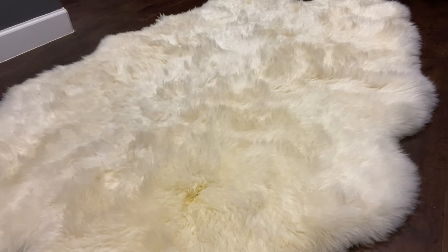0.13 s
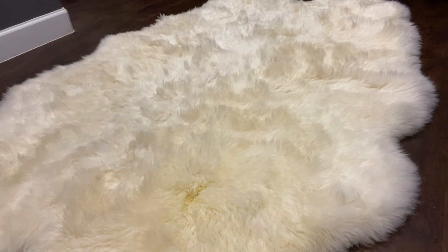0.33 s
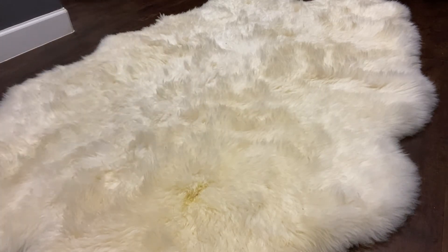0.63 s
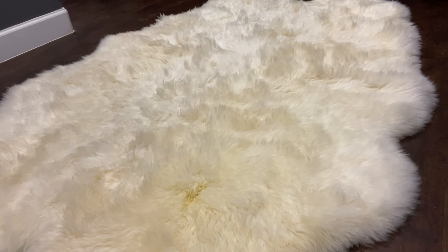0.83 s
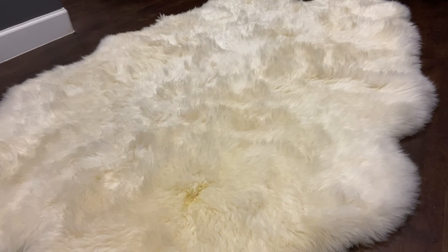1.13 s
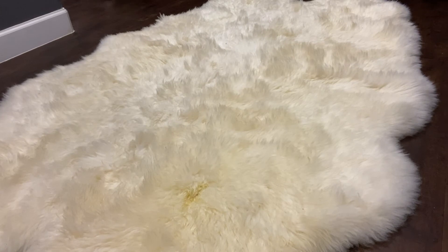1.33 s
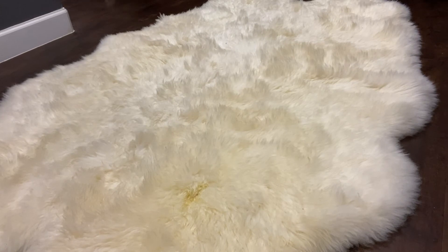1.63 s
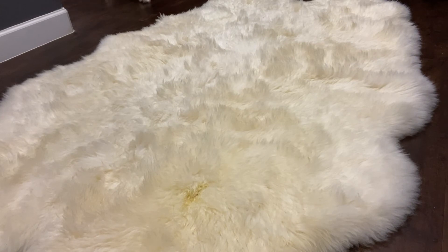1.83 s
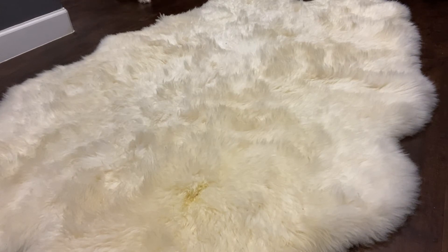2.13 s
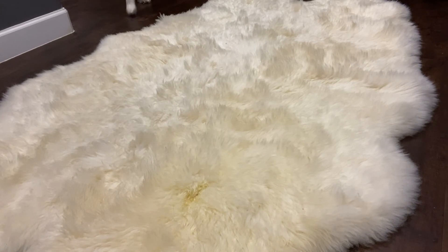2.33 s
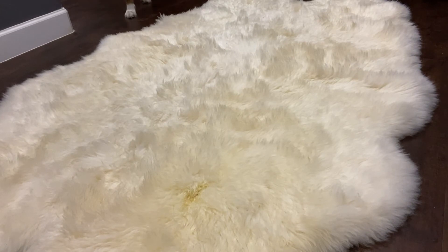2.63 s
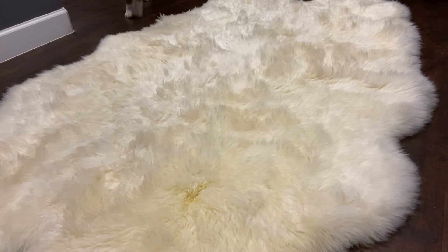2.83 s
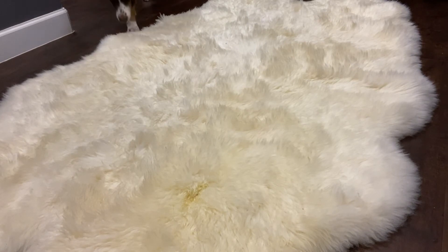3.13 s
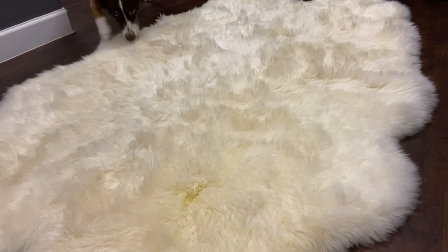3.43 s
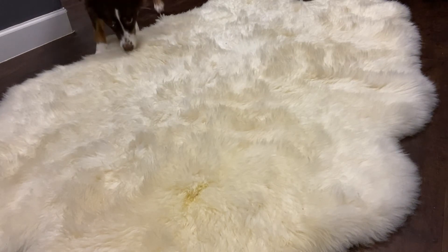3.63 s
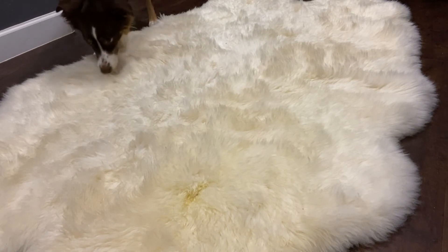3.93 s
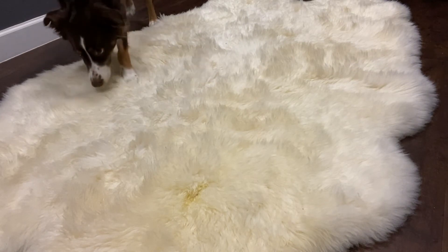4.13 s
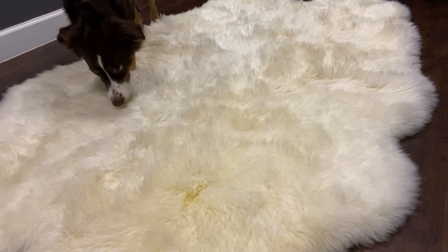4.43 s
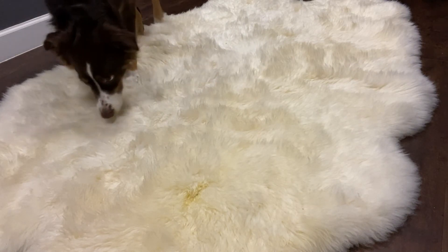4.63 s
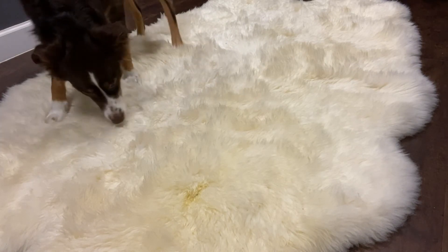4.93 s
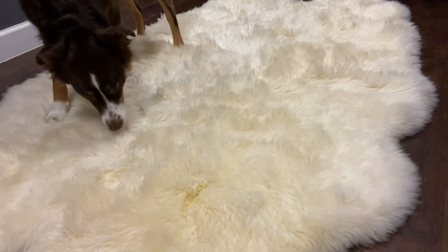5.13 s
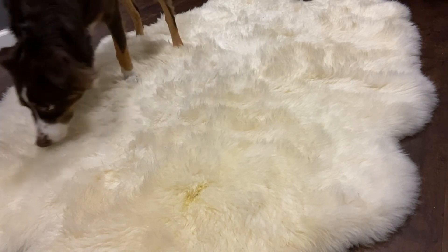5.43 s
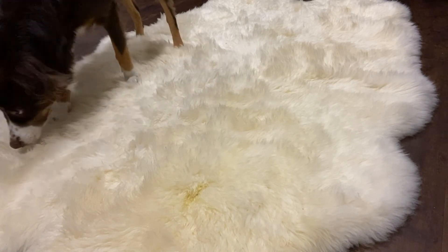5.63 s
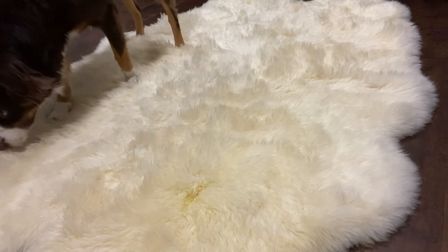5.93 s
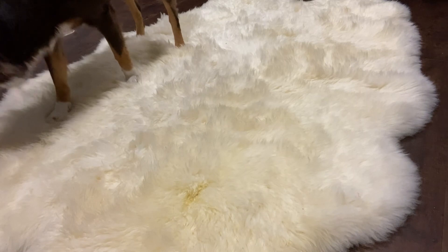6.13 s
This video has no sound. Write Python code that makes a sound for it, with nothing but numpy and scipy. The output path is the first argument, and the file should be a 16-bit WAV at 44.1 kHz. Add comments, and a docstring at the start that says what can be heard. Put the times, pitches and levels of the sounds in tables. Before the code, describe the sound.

Nine muffled, bassy steps cross springy boards indoors over a low hum, followed by scraping, creaking wooden furniture and one hard resonant knock.

```python
"""First a soft footstep booms on a wooden floor, over a low hum; more steps follow across a live room.
Each step swings the boards and pats the sole in short runs of noise; clothes swish and small ticks sound.
Then furniture is shifted and bumped: noisy contacts ring its panels, and its joints creak faintly.
Two close microphone ports hear the direct sound and the noise-like echo of the room."""
import sys
import numpy as np
from scipy import signal
from scipy.fft import rfft, irfft, next_fast_len
from scipy.io import wavfile
from scipy.ndimage import uniform_filter1d

SR = 44100
rng = np.random.default_rng(int(sys.argv[2]) if len(sys.argv) > 2 else 0)


def pcm_store(signal):
    """Save signal as 16-bit PCM."""
    levels = np.round(np.clip(np.atleast_2d(signal), -1, 1) * 32767)
    wavfile.write(sys.argv[1], SR, levels.astype(np.int16).T)


N = 277036  # length of the scene in samples
T = np.arange(SR) / SR  # time within one sound [s]; each lasts up to a second
HZ = np.fft.rfftfreq(2 * SR, 1 / SR)  # frequencies of a two-second transform


def amp(db):
    """Turn decibels into gain."""
    return 10 ** (np.asarray(db) / 20)


def unit(x):
    """Scale to an rms of 1."""
    return x / np.sqrt(np.mean(x ** 2) + 1e-20)


def crest(x):
    """Scale so that the loudest 20 ms have an rms of 1."""
    power = uniform_filter1d(np.mean(x ** 2, axis=0), size=SR // 50)
    return x / np.sqrt(power.max() + 1e-20)


def along(points, hz):
    """Read a curve of (frequency, value) points on a logarithmic frequency axis."""
    f, v = np.transpose(points)
    return np.interp(np.log(hz + 1), np.log(f + 1), v)


def filtered(x, response):
    """Shape a sound by a response that depends on frequency."""
    n = x.shape[-1]
    padded = next_fast_len(n + SR // 10)
    spectrum = rfft(x, padded) * response(np.fft.rfftfreq(padded, 1 / SR))
    return irfft(spectrum, padded)[..., :n]


def resonance(hz, centre, width):
    """One mode's response, 1 at its centre."""
    return 1j * hz * width / (centre ** 2 - hz ** 2 + 1j * hz * width)


def add(track, s, sound):
    """Mix a sound into the track at time s."""
    start = round(s * SR)
    part = sound[:, max(-start, 0):N - start]
    track[:, max(start, 0):][:, :part.shape[1]] += part


def grains(rough_db):
    """A dense run of tiny contacts: noise whose strength changes at random every millisecond."""
    size = np.interp(T, np.arange(1001) / 1000, rng.standard_normal(1001))
    return rng.standard_normal(SR) * amp(rough_db * size)


def blow(length):
    """A force that swells to its peak in the given time and dies away."""
    return (T / length * np.exp(-T / length)) ** 2


def swell(half):
    """A bell-shaped stroke that peaks a quarter of a second in."""
    return np.exp(-((T - 1 / 4) / half) ** 2 / 2)


def coloured(x, spectrum, body_db, middle_db, treble_db, ripple_db=3.5):
    """The material's spectrum, rippled by the spot that is touched; hardness sets the three bands."""
    low = 1 / (1 + (HZ / 700) ** 6)
    high = 1 / (1 + (HZ / 3500) ** 6)
    knots = 300 * np.expm1(np.linspace(0, 1, 150) ** .6 * np.log(SR / 600))
    ripple = np.interp(HZ, knots, rng.standard_normal(len(knots))) / (1 + HZ / 9000)
    z = rfft(x, 2 * SR) * amp(along(spectrum, HZ) + ripple_db * ripple)
    shares = [(low, body_db), (high - low, middle_db), (1 - high, treble_db)]
    return sum(amp(db) * crest(irfft(z * share)[:, :SR]) for share, db in shares)


# how different the two ports are in sound from all around: (frequency [Hz], side minus mid [dB])
PORT_WIDTH = [(60, -15), (130, 0.5), (220, -5.5), (380, -3), (700, 1.5), (1250, 4.5), (2400, -0.5),
              (4400, -0.5), (8000, -3), (14000, 5.5)]


def diffuse(n):
    """Noise from all around: a shared part, and a part with opposite sign at the two ports."""
    def shares(hz):
        ratio = amp(along(PORT_WIDTH, hz))
        return np.array([np.ones_like(hz), ratio]) / np.hypot(1, ratio)

    mid, side = filtered(rng.standard_normal((2, n)), shares)
    return np.array([mid + side, mid - side])


# how long the room rings: (frequency [Hz], time to fall by 60 dB [s])
ROOM_DECAY = [(60, 0.4), (250, 0.71), (1000, 0.53), (2200, 0.54), (5000, 0.38), (9000, 0.47), (14000, 0.22)]
# direct sound at the two ports: (frequency [Hz], phase by which the left leads [radians])
PORT_LEAD = [(0, -1), (520, 2.18), (1550, 3.0), (3010, 9), (5680, 10.5), (6370, 10.5), (6800, 10.5),
             (8180, 12), (10100, 7.5), (10900, 5.5), (12500, 19.5), (13700, 14), (14600, 24.5),
             (15000, 22.5)]


def in_room(source, direct_db, early_db, early_t60=0.17, gap=0.0039):
    """The direct sound comes first; then near walls and the whole room give its energy back."""
    hz, t, noise = signal.stft(diffuse(SR), SR, nperseg=128)
    energy = np.mean(abs(signal.stft(source, nperseg=128)[2]) ** 2, axis=0)
    late = amp(-60 * t / along(ROOM_DECAY, hz)[:, None]) ** 2
    early = amp(early_db - 60 * t / early_t60) ** 2
    decay = (late + early) * (1 - np.exp(-t / gap))  # the echo builds up over the gap [s]
    stored = np.abs(signal.fftconvolve(energy[None], decay, axes=1)[:, :len(t)])
    tail = signal.istft(noise * np.sqrt(stored), SR, nperseg=128)[1][:, :SR]
    lag = np.interp(HZ, *np.transpose(PORT_LEAD))
    direct = irfft(rfft(source, 2 * SR) * np.exp(-1j * np.array([0 * lag, lag])))[:, :SR]
    return amp(direct_db) * unit(direct) + unit(tail)


# colour of the quiet room's air, before its overall level: (frequency [Hz], level per Hz [dB])
AIR_SPECTRUM = [(20, -22), (50, 2.5), (80, 4), (180, -16), (370, -15.5), (600, -24.5), (1000, -29),
                (2000, -38.5), (3500, -39.5), (6000, -40.5), (9000, -43.5), (13500, -41.5), (15000, -66)]


def room_air(air_db=-55, hum_hz=120, hum_db=-60):
    """The steady rumble of the house is shaped noise; its mains hum is one sine wave."""
    air = unit(filtered(diffuse(N), lambda hz: amp(along(AIR_SPECTRUM, hz))))
    hum = np.sin(2 * np.pi * hum_hz * np.arange(N) / SR)
    return amp(air_db) * air + amp(hum_db) * hum


# colour of a soft sole on the floor, before its bands are levelled: (frequency [Hz], level per Hz [dB])
SOLE_SPECTRUM = [(90, -26), (160, -5), (260, 3.5), (420, 4), (700, -3), (1100, -2), (1600, -5),
                 (2400, -10.5), (3500, -22.5), (5000, -33.5), (8000, -38.5), (13000, -42.5), (15000, -58)]


def shuffles(count=34, span_s=5.2, body_db=-61, middle_db=-65, treble_db=-72, spread_db=10):
    """Faint stray touches of feet, one at a random moment in each equal slice of the span."""
    out = np.zeros((2, N))
    for k, (when, size) in enumerate(rng.random((count, 2))):
        touch = in_room(grains(rough_db=10.0) * blow(.006), direct_db=-3.5, early_db=1)
        touch = coloured(touch, SOLE_SPECTRUM, body_db, middle_db, treble_db)
        add(out, (k + when) / count * span_s, amp(spread_db * (size - 0.5)) * touch)
    return out


# small sharp ticks: (time of peak force [s], treble level [dB], middle re treble [dB])
FLOOR_TICKS = [(.03, -44.5, -3), (0.3977, -54.5, -3.5), (0.6141, -47.5, -20), (.929, -52.5, -3.5),
               (1.696, -53, -2), (2.148, -45, -14), (2.179, -53.5, 6), (2.821, -66.5, 0),
               (3.3272, -45.5, 1), (3.5193, -59, 11), (3.619, -60.5, 2.5), (3.8887, -45.5, -14),
               (4.378, -51, 11.5), (4.609, -53.5, 0.5)]


def ticks(length=.0021, body_db=-4):
    """Hard little contacts on the floor, near enough to arrive ahead of the room."""
    out = np.zeros((2, N))
    for s, db, middle_db in FLOOR_TICKS:
        tick = in_room(grains(rough_db=4) * blow(length), direct_db=-2, early_db=9)
        add(out, s - length, amp(db) * coloured(tick, CLOTH_SPECTRUM, body_db, middle_db, 0))
    return out


# middle band re treble in a usual swish, its half length, and how much duller slower strokes are
SWISH_MIDDLE_DB, SWISH_HALF_S, DULLER_DB_PER_OCTAVE = 1, 0.049, 5
# colour of cloth, also lent to the ticks, before its bands are levelled: (frequency [Hz], level per Hz [dB])
CLOTH_SPECTRUM = [(150, 0.5), (400, -2.5), (1200, -2), (2300, -4.5), (3600, -3), (5500, -8), (8000, -8.5),
                  (10000, -11.5), (13000, -15.5), (15000, -24)]


def clothes(body_db=-1.5, fizz=0.91):
    """Fabric brushes past itself with each stride; quick strokes have the most fizz."""
    out = np.zeros((2, N))
    for s, *_, after, db, half in STRIDES:
        middle_db = SWISH_MIDDLE_DB + DULLER_DB_PER_OCTAVE * np.log2(half / SWISH_HALF_S)
        swish = in_room(grains(rough_db=6) * swell(half), direct_db=-2.5, early_db=15.5)
        cloth = [(hz, level - fizz * middle_db * (hz > 9000)) for hz, level in CLOTH_SPECTRUM]
        swish = coloured(swish, cloth, middle_db + body_db, middle_db, 0)
        add(out, s + after - 1 / 4, amp(db) * swish)
    return out


# creaks of a joint: (centre time [s], level [dB], half length [s], pitch [Hz])
JOINT_CREAKS = [(3.665, -57, .012, 890), (4.361, -43.5, .04, 2960), (4.402, -35, 0.021, 955),
                (4.462, -46.5, .022, 950), (4.681, -44, 0.064, 910), (4.896, -44.5, .04, 2770)]


def creaks(sharpness=15):
    """A loaded joint slips unevenly and sings in one narrow resonance."""
    out = np.zeros((2, N))
    for s, db, half, hz in JOINT_CREAKS:
        slip = in_room(grains(rough_db=6) * swell(half), direct_db=-3, early_db=2)
        sung = filtered(slip, lambda f: resonance(f, hz, hz / sharpness) ** 2)
        add(out, s - 1 / 4, amp(db) * crest(sung))
    return out


# the furniture's panel modes, before panel_db is added: (frequency [Hz], level [dB])
PANEL_MODES = [(217, 1), (248, -19), (277, -1), (375, 1.5), (467, -0.5), (513, -8), (667, 5), (803, -10),
               (830, -3.5), (919, 3), (1000, -10.5), (1078, -0.5), (2584, -4.5), (2832, 5)]


def panels(x, panel_db=-1, panel_width_hz=11):
    """The furniture's wooden panels ring with whatever shakes them; higher modes are wider."""
    modes = 1 + sum(amp(level + panel_db) * resonance(HZ, hz, panel_width_hz * np.sqrt(hz / 300))
                    for hz, level in PANEL_MODES)
    return irfft(rfft(x, 2 * SR) * modes)[:, :SR]


# colour of wood, before its bands are levelled: (frequency [Hz], level per Hz [dB])
WOOD_SPECTRUM = [(90, -11.5), (160, -14), (205, -11), (300, -8), (450, -9.5), (650, -8.5), (1050, -5),
                 (1600, -8), (2700, -16), (3300, -17.5), (4600, -19), (6000, -24.5), (7700, -23.5),
                 (9500, -31.5), (13500, -31), (15000, -53)]
# a scraping push, then the fading tail of the big knock, before level_db is added: (time [s], level [dB])
SCRAPE_AND_TAIL = [
    [(4.3, -39.5), (4.414, -45.5), (4.616, -51.5), (4.654, -52), (4.788, -63), (4.892, -39), (4.948, -48.5),
     (4.96, -31.5)],
    [(5.18, -39.5), (5.246, -47), (5.346, -52), (5.366, -42.5), (5.38, -48.5)],
]


def uneven_wood(level_db=-3, body_db=-2, treble_db=-10):
    """Uneven wooden noise: first a scraping push, then the fading tail of the big knock."""
    out = np.zeros((2, N))
    for points in SCRAPE_AND_TAIL:
        s, db = np.transpose(points)
        strength = amp(np.interp(s[0] + T, s, db, right=-120))
        uneven = grains(rough_db=7.5) * strength
        noise = panels(in_room(uneven, direct_db=-8, early_db=6.5))
        noise = coloured(noise, WOOD_SPECTRUM, body_db, 0, treble_db)
        add(out, s[0], amp(db.max() + level_db) * noise)
    return out


def rattle(length, ring_hz, ring_db=0.0, ring_width=0.2):
    """A short run of contacts that rings the panels and fills the room."""
    contacts = in_room(grains(rough_db=1.5) * blow(length), direct_db=-2.0, early_db=1.5)
    return filtered(panels(contacts), lambda f: 1 + amp(ring_db) * resonance(f, ring_hz, ring_width * ring_hz))


# an edge strikes first: its middle band; the mass follows: its delay, and its rattle length re the edge's
EDGE_DB, MASS_LAG_S, MASS_LENGTH_RATIO = -1, .011, 0.98
# furniture knocks: (time [s], level [dB], body re level [dB], treble re level [dB], edge rattle length [s],
#   edge resonance [Hz], mass resonance [Hz], load on the floor [dB], pitch of the boards [Hz])
FURNITURE_KNOCKS = [(4.225, -25, -9, -8, 0.017, 1060, 1270, -12, 71.4),
                    (4.371, -34.5, -1, -13, 0.0054, 940, 970, -16.5, 48.6),
                    (4.83, -41, 5.5, -31, .018, 743, 400, -18, 66.4),
                    (4.984, -19.5, 6, -7.5, 0.011, 1008, 236, -11.5, 86),
                    (5.368, -40.5, 1, -6.5, 0.0089, 1970, 292, -34, 65),
                    (5.9, -35.5, -1.5, -10, 0.013, 2130, 620, -35.5, 61.3)]


def furniture(edge_body_db=-10, mass_treble_db=-7, left_db=0.08):
    """Each knock is a bright edge, then the duller mass behind it."""
    out = np.zeros((2, N))
    for s, db, body_db, treble_db, length, edge_hz, mass_hz, *_ in FURNITURE_KNOCKS:
        edge = rattle(length, edge_hz)
        edge = coloured(edge, WOOD_SPECTRUM, body_db + edge_body_db, EDGE_DB, treble_db)
        add(out, s, amp(db) * edge)
        mass = rattle(length * MASS_LENGTH_RATIO, mass_hz)
        mass = coloured(mass, WOOD_SPECTRUM, body_db, 0, treble_db + mass_treble_db)
        add(out, s + MASS_LAG_S, amp(db) * mass)
    return out * amp([[left_db], [-left_db]])


def pat(length, ring_hz, body_db, treble_db, ring_db=1, ring_width=0.38):
    """A soft contact some way off, coloured like a sole on the floor; uneven grains make it crackle."""
    contact = in_room(grains(rough_db=8) * blow(length), direct_db=-2, early_db=3)
    contact = filtered(contact, lambda f: 1 + amp(ring_db) * resonance(f, ring_hz, ring_width * ring_hz))
    return coloured(contact, SOLE_SPECTRUM, body_db, 0, treble_db)


# other small soft noises: (time [s], level [dB], body re level [dB], treble re level [dB],
#   contact length [s], main resonance [Hz])
SOFT_NOISES = [(0.549, -46, -12, -1, 0.0033, 2180), (0.661, -37, -3, -6, 0.0059, 2040),
               (0.956, -40.5, -3, -26, 0.005, 750), (1.673, -42.5, -3, -6, 0.0032, 1870),
               (1.839, -49, -35, -3.5, 0.011, 1730), (1.927, -55.5, -18, -16, 0.027, 2300),
               (2.74, -59.5, -16, -8.5, 0.0044, 2430), (2.925, -50, -0.5, -21.5, 0.0045, 1070),
               (3.033, -51, -14, -5.5, 0.0096, 1430), (3.303, -55.5, 8.5, -15, .006, 740),
               (3.898, -35, -34, -11, 0.016, 930), (4.089, -54.5, -4, -4, 0.029, 1100),
               (6.167, -65.5, 10, 1.5, 0.017, 2200)]


def soft_noises():
    """Other small soft noises, each a short run of grains: scuffs, a crunch and loose swishes."""
    out = np.zeros((2, N))
    for s, db, body_db, treble_db, length, ring_hz in SOFT_NOISES:
        add(out, s, amp(db) * pat(length, ring_hz, body_db, treble_db))
    return out


# the sole comes down flat after its first touch: delay, level re the touch, extra body
FLAT_S, FLAT_DB, FLAT_BODY_DB = .037, -4, 8
# contact length, treble of the grit at the first touch (FLAT_DB also applies when flat), main resonance
PAT_S, GRIT_DB, SOLE_HZ = 0.011, -56, 787


def soles():
    """In each stride the sole touches, then comes down flat."""
    out = np.zeros((2, N))
    for s, _, _, _, _, after, db, body_db, *_ in STRIDES:
        touch = pat(PAT_S, SOLE_HZ, body_db, GRIT_DB - db)
        add(out, s + after, amp(db) * touch)
        flat = pat(PAT_S, SOLE_HZ, body_db + FLAT_BODY_DB, GRIT_DB - db)
        add(out, s + after + FLAT_S, amp(db + FLAT_DB) * flat)
    return out


BALL_PITCH = 0.889  # the full weight lowers the boards' pitch by this ratio
ROCK_S, ROCK_LOSS_DB, REST_HZ = .075, 11, 57.4  # the weight rocks to rest: period, loss per rock, pitch
# the floor takes a knock's load after a lag, then the piece tips onto its other side: delay, level re load
LOAD_LAG_S, TIP_S, TIP_DB = 0.039, 0.0607, -1.5
# one row per stride: (heel time [s], weight [dB], pitch of the boards [Hz], roll to the ball [s],
#   ball re heel [dB], sole touches after heel [s], pat level [dB], pat body re level [dB],
#   swish peak after heel [s], swish treble level [dB], swish half length [s])
STRIDES = [(.001, -26, 61.7, .04, -3.5, -0.0098, -53, -7.5, 0.15, -45, 0.011),
           (0.623, -17, 81.4, 0.046, 5, 0.00048, -54, 5.5, 0.084, -40.5, 0.017),
           (1.069, -16.5, 52.6, 0.1, -2.5, -0.028, -48, 2, 0.06, -50, .028),
           (1.561, -9.5, 68.5, .056, 0, -.01, -57, 4.5, 0.014, -51, 0.084),
           (2.018, -20, 54.5, 0.052, 3.5, -0.046, -39, -9, 0.081, -55.5, 0.049),
           (2.468, -23, 64.3, 0.044, 9.5, -.044, -43, -7, 0.06, -56, 0.053),
           (2.918, -13, 71.4, 0.0491, 1, .007, -60.5, 0.5, .085, -57.5, 0.047),
           (3.356, -16, 55, .074, -0.5, -.008, -37, 0, 0.079, -57.5, 0.038),
           (3.775, -17.5, 57.7, .07, -5, .069, -40, 1, 0.14, -59, 0.094)]


def loads():
    """Weight lands, rolls onto a second point and rocks to rest: (time [s], level [dB], pitch [Hz])."""
    landings = [step[:5] for step in STRIDES]
    landings += [(s + LOAD_LAG_S, db, hz, TIP_S, TIP_DB) for s, *_, db, hz in FURNITURE_KNOCKS]
    for s, db, hz, roll, ball_db in landings:
        yield s, db, hz
        yield s + roll, db + ball_db, hz * BALL_PITCH
        for k in (1, 2):
            yield s + roll + k * ROCK_S, db + ball_db - k * ROCK_LOSS_DB, REST_HZ


# heavier loads stir the boards' upper mode more: reference weight [dB], extra dB per dB above it
HEAVY_DB, HEAVY_SLOPE = -13.5, 0.15
# colour of the room's bass, before its overall level: (frequency [Hz], level per Hz [dB])
BOOM_SPECTRUM = [(15, -19.5), (44, 5), (74, 1.5), (100, -12), (150, -21.5), (400, -57.5)]


def boards(rise=0.0091, t60=0.21, upper=1.427, upper_db=-11, boom_db=-13, boom_t60=0.87,
           right_db=1.4, low_hz=29, high_hz=150):
    """Each load sets the sprung floor swinging for a few cycles; the room booms on after it."""
    out = np.zeros((2, N))
    for s, db, hz in loads():
        onset = 1 - np.exp(-(T / rise) ** 2)
        overtone_db = upper_db + HEAVY_SLOPE * (db - HEAVY_DB)
        overtone = amp(overtone_db) * np.sin(2 * np.pi * hz * upper * T)
        swing = (np.sin(2 * np.pi * hz * T) + overtone) * onset * amp(-60 * T / t60)
        air = unit(filtered(diffuse(SR), lambda f: amp(along(BOOM_SPECTRUM, f))))
        boom = amp(boom_db) * air * onset * amp(-60 * T / boom_t60)
        pan_db = np.interp(s, [3, 4.5], [right_db, 0])  # the steps move from the right to the centre
        add(out, s, amp(db + np.array([[-pan_db], [pan_db]])) * (swing + boom))
    return filtered(out, lambda f: (1 - 1 / (1 + (f / low_hz) ** 4)) / (1 + (f / high_hz) ** 8))


def scene():
    """All the sounds of the room together, from the background to the steps on the boards."""
    background = room_air() + shuffles() + ticks() + clothes()
    moved_piece = creaks() + uneven_wood() + furniture()
    return background + moved_piece + soft_noises() + soles() + boards()


def record(dry, notch_hz=10500, notch_width_hz=380, notch_db=-38, top_hz=15400):
    """The microphone has a narrow treble notch and a band limit."""
    def response(hz):
        notch = amp(notch_db * np.exp(-((hz - notch_hz) / notch_width_hz) ** 2))
        return notch * (hz < top_hz)

    return filtered(dry, response)


dry = scene()
out = record(dry)
pcm_store(out)
```